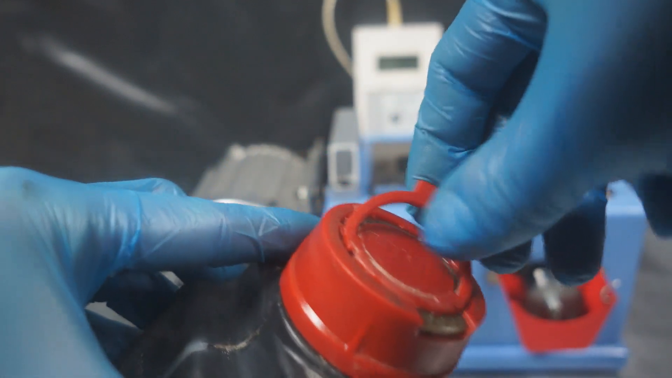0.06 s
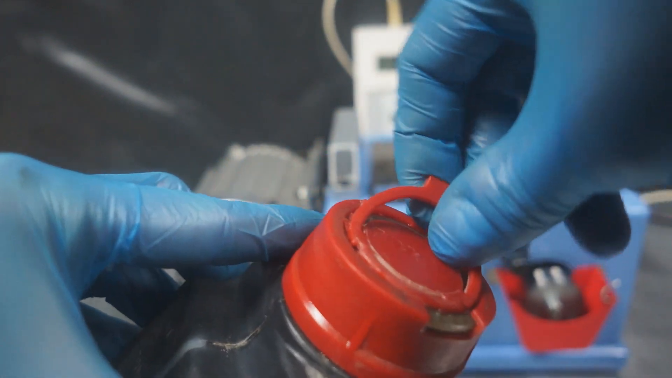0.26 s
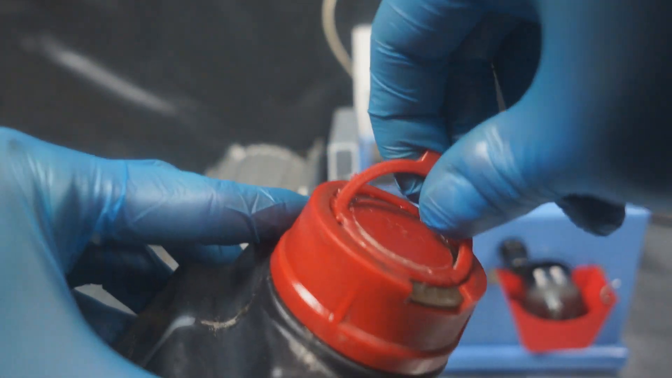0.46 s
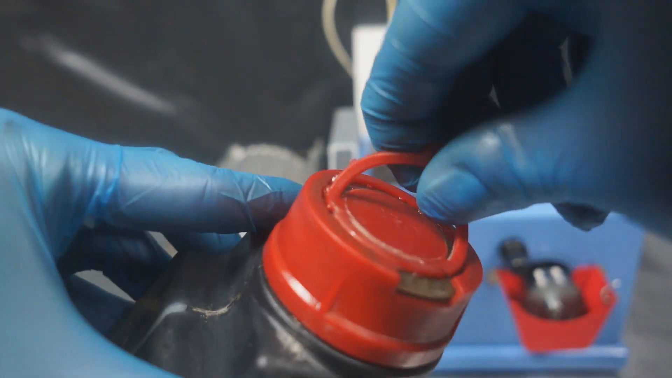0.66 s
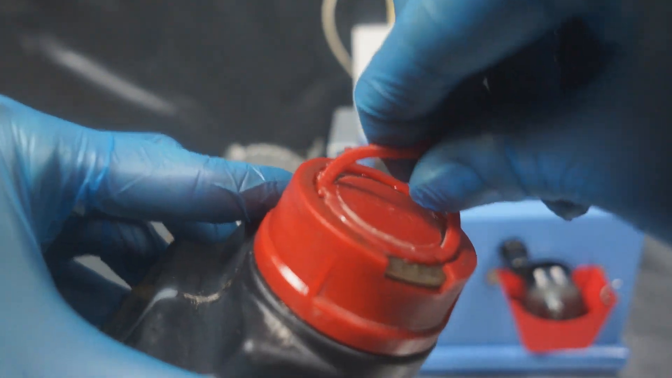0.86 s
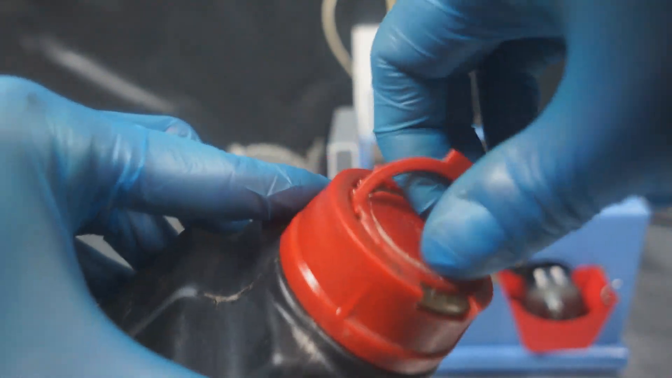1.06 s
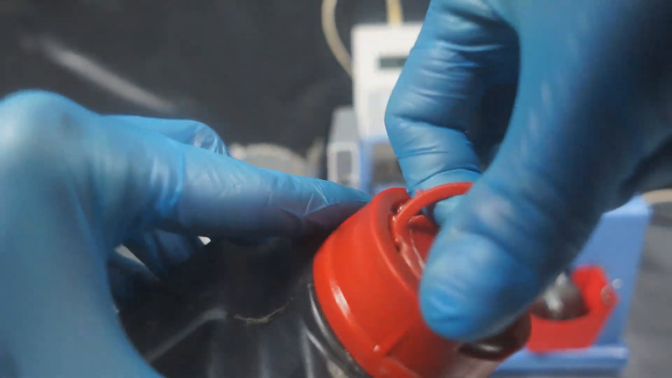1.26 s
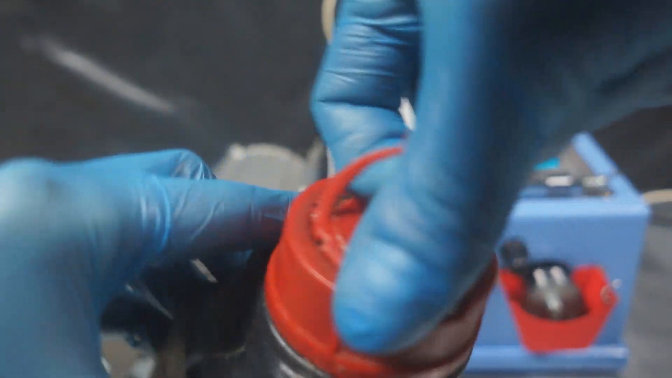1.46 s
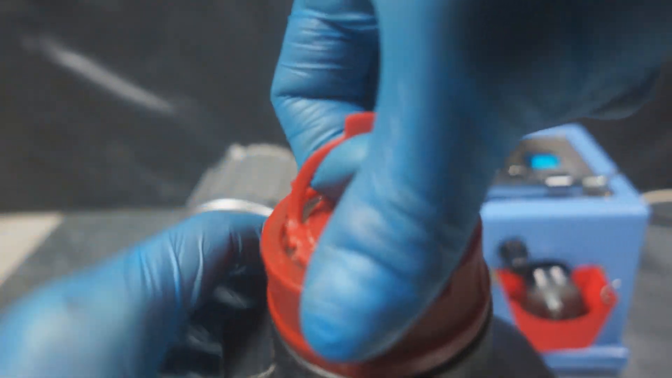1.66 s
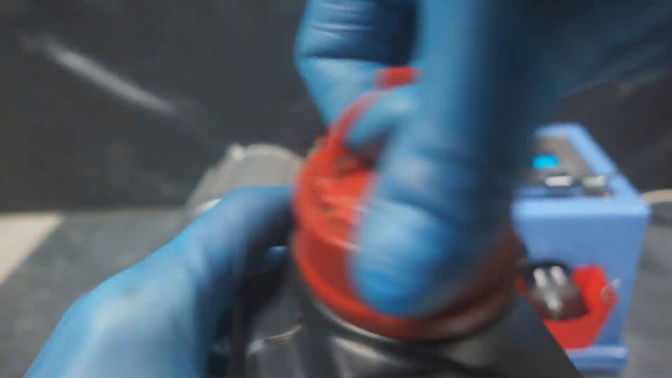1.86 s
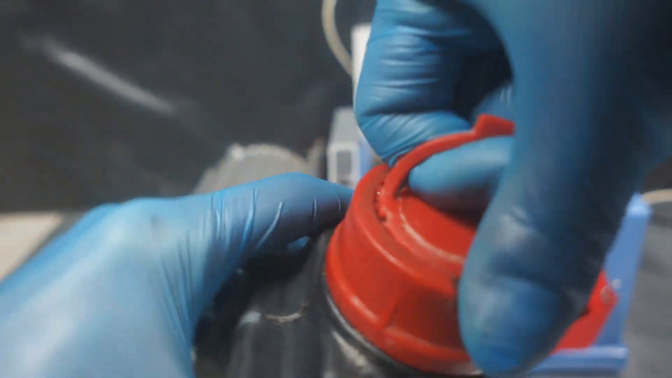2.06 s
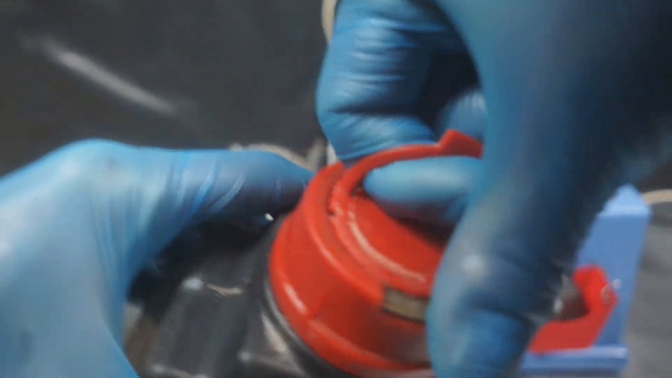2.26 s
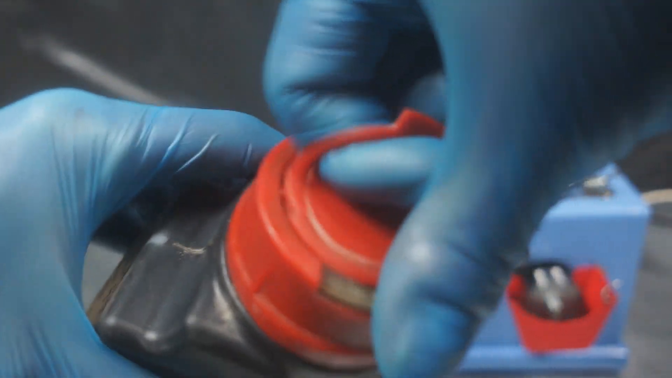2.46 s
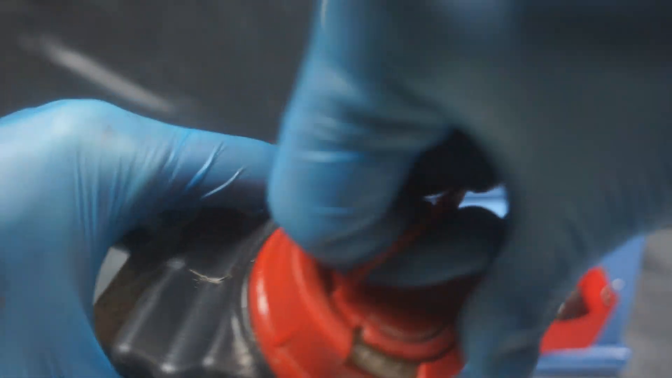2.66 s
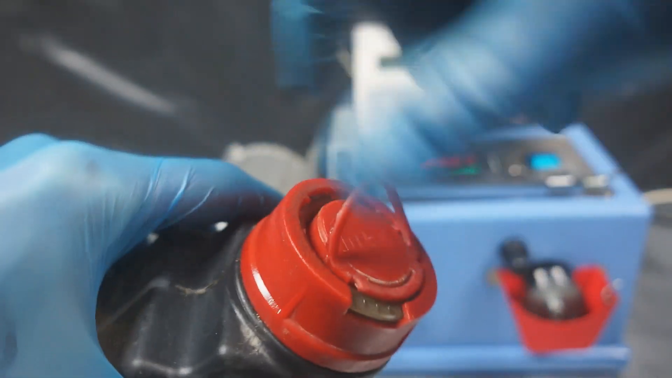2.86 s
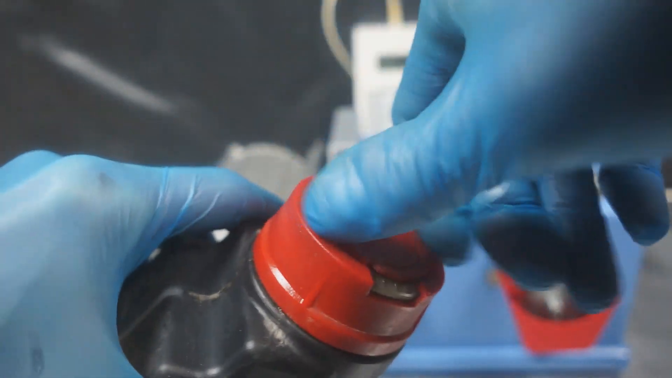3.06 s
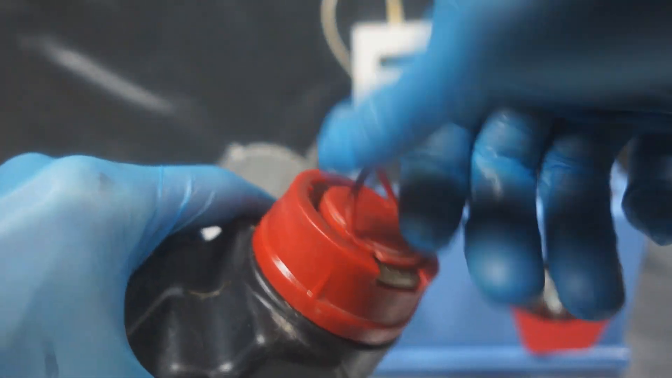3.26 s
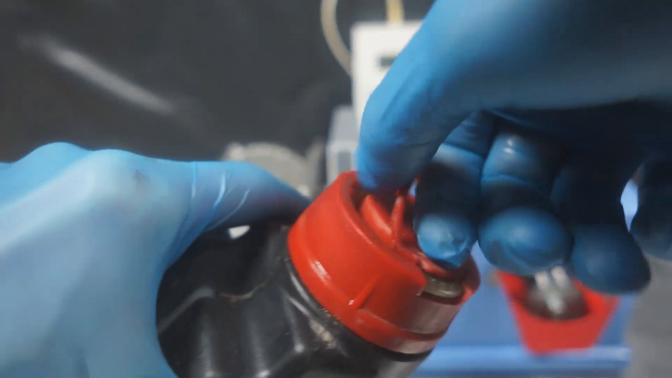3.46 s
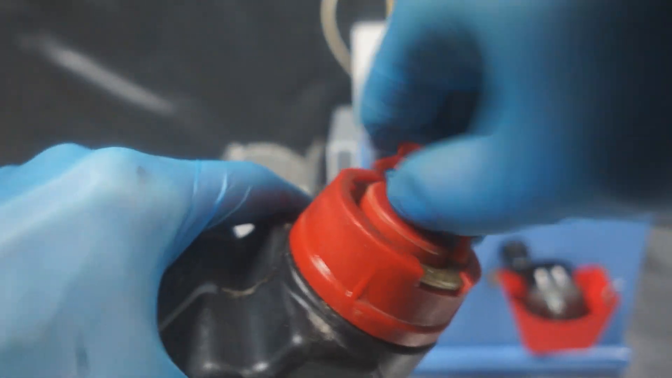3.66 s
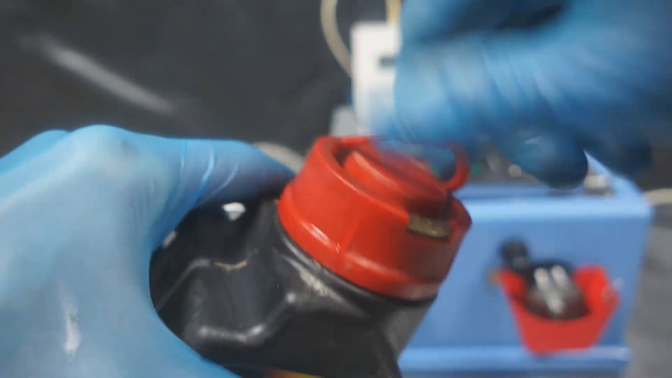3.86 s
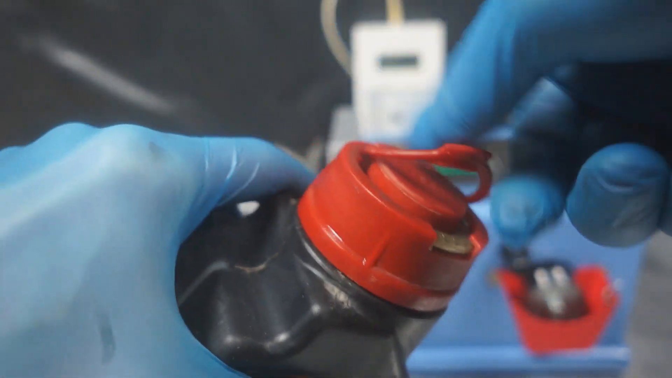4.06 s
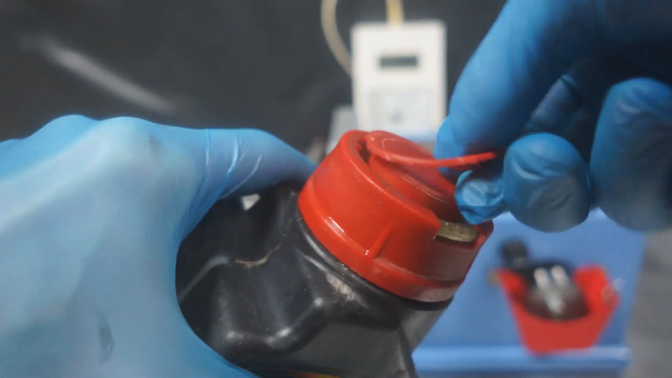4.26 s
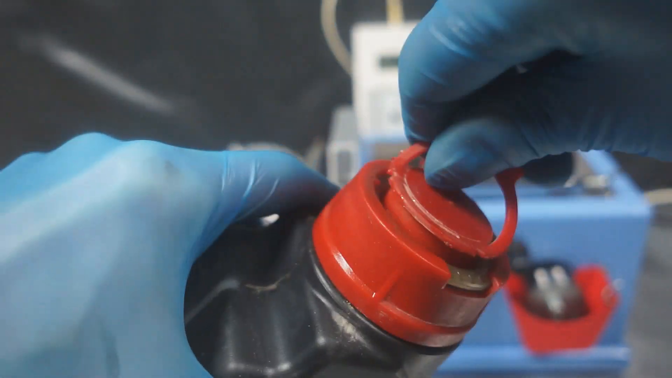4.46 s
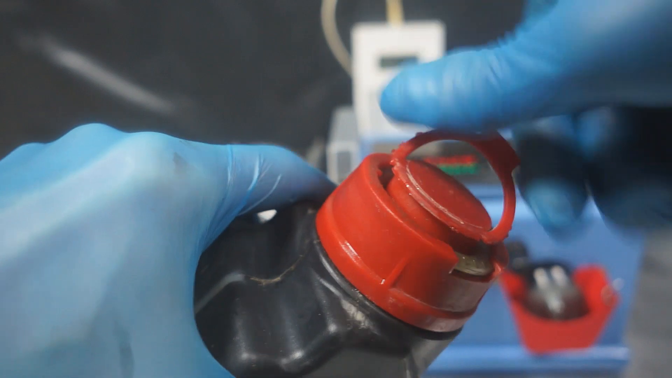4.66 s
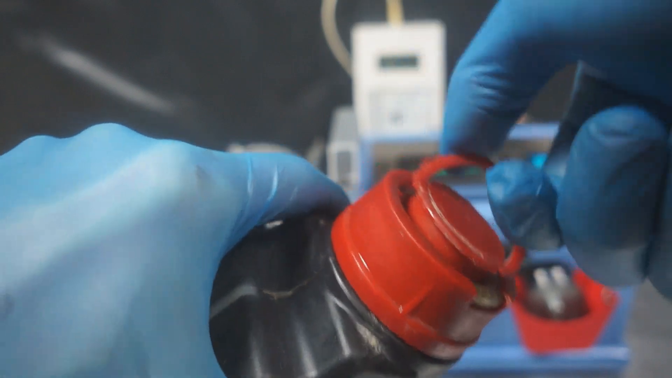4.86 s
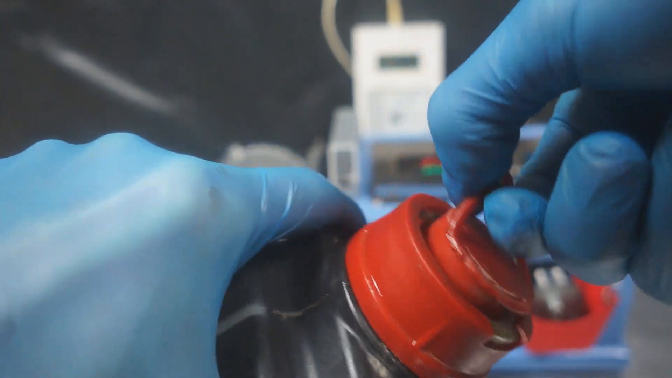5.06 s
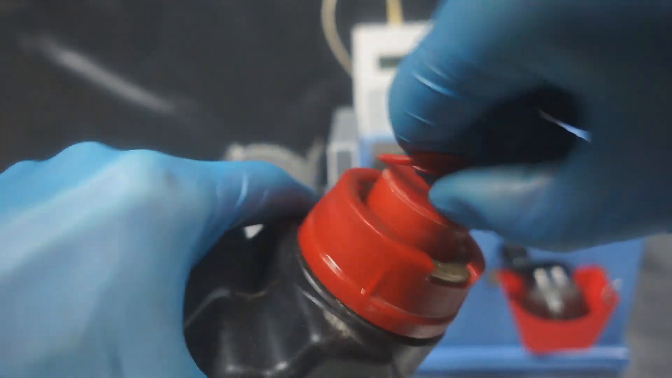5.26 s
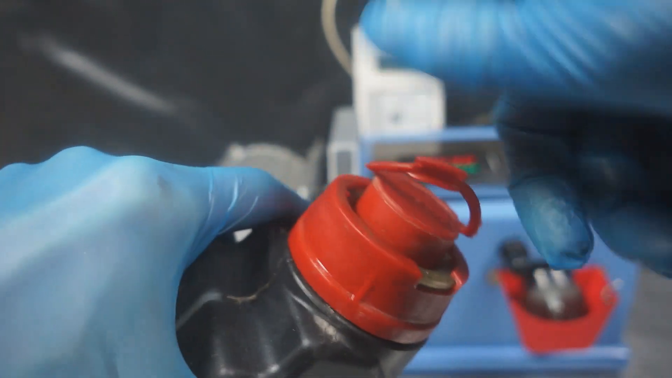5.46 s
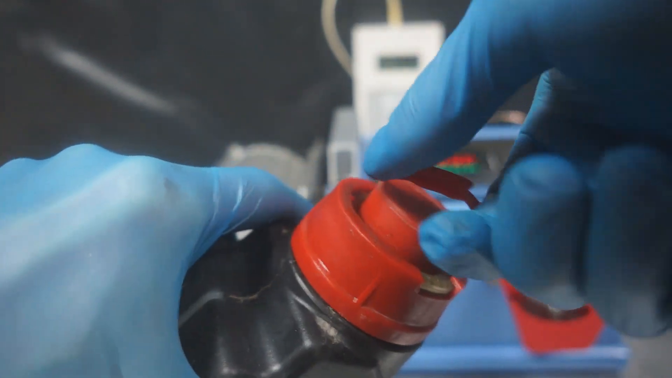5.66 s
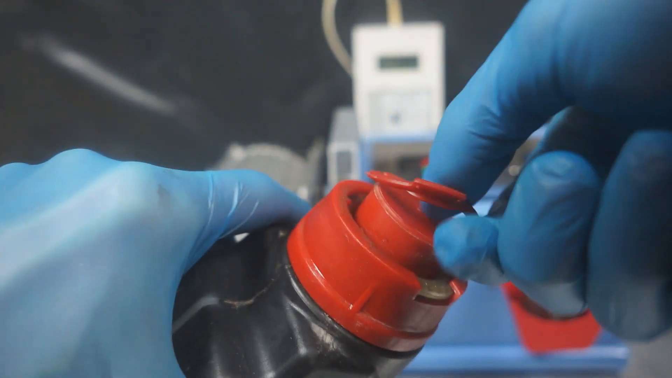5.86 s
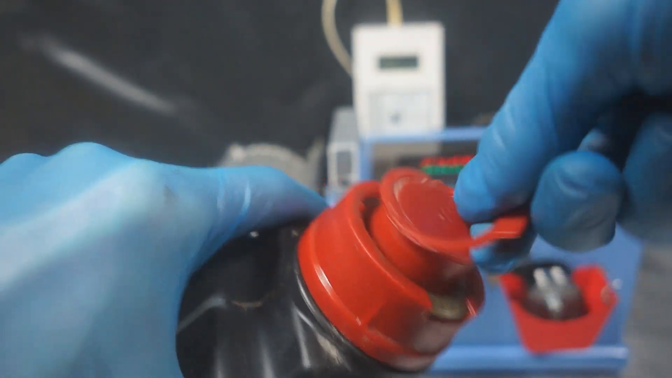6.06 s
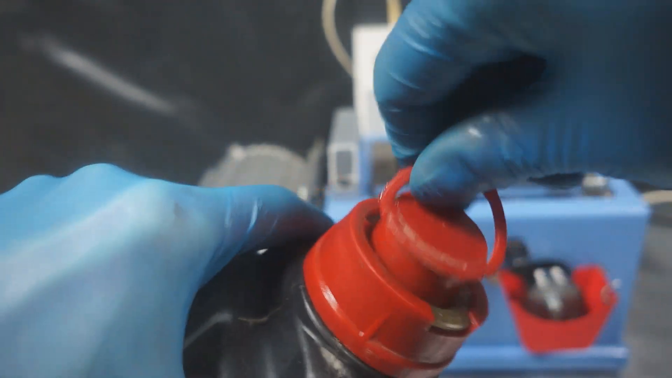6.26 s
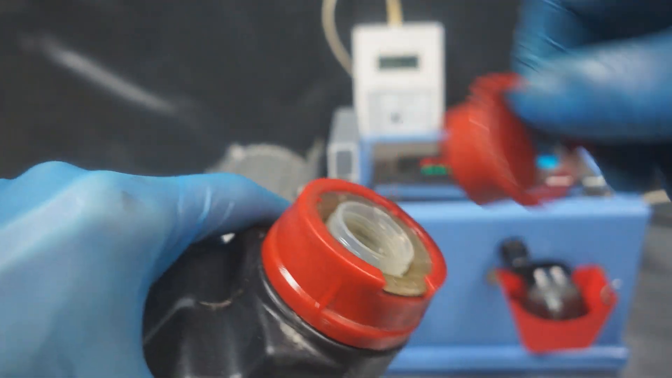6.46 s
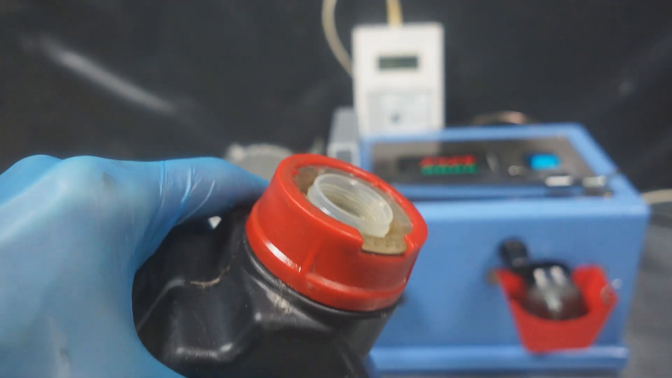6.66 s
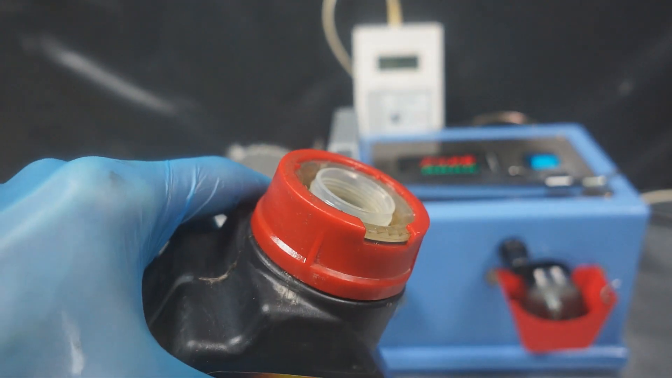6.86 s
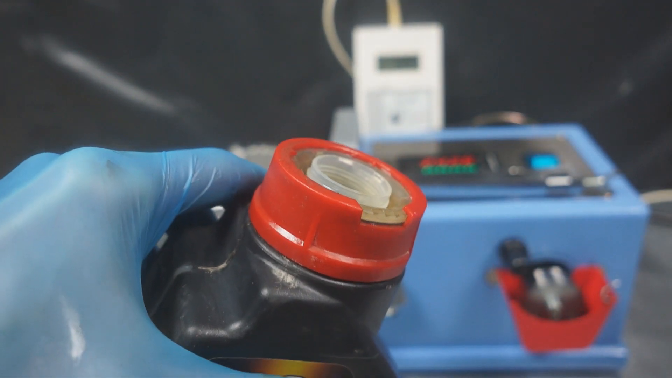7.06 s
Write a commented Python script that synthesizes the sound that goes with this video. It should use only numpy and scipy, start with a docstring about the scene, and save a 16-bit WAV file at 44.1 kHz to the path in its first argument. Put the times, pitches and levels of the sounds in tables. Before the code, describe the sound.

Close rubbery squeaks, irregular plastic clicks and sharp cracks on an oil bottle cap, a small air gulp, then one loud plastic clack.

```python
"""A small workshop's fan hums while gloved fingers, close by, rub and pry the pull-ring plug of a plastic oil bottle.
Air and hum are filtered noise; the gloves are uneven noise grains shaped by strokes, with resonant noise bursts.
Snaps are noise cracks, pings and ringing cap modes; thuds are slow bottle modes, and air gulps are gliding sines.
At the end the plug clacks on the bench and bounces: decaying modes, chatter and dust with a wetter room tail."""
import sys
import numpy as np
from scipy import signal
from scipy.fft import rfft, irfft
from scipy.io import wavfile
from scipy.ndimage import uniform_filter1d

SR = 44100
rng = np.random.default_rng(int(sys.argv[2]) if len(sys.argv) > 2 else 0)


def transcribe(u):
    """Save the signal u as a 16-bit wav file named by the first command-line argument.

    u: samples, shape (n,) or (channels, n), limited to [-1, 1]; the rate is SR.
    q: integer samples, one column per channel.
    """
    v = np.clip(np.atleast_2d(u).T, -1, 1)
    q = np.round(v * 32767).astype(np.int16)
    wavfile.write(sys.argv[1], SR, q)


N = 313551
HZ = np.maximum(np.fft.rfftfreq(N, 1 / SR), 1)
HANDS_PAN_DB, BOTTLE_PAN_DB = 2.5, -1.5  # left minus right
BUSY_S = (1.0, 6.35)  # between these times the gloves never lie still


def undb(db):
    """Turn decibels into an amplitude factor."""
    return 10 ** (np.asarray(db) / 20)


def level(x, db):
    """Scale a sound to an RMS level in dB."""
    return x * undb(db) / np.sqrt(np.mean(x ** 2))


def along(table):
    """Read a (frequency [Hz], value) table at every frequency, straight between points on a log axis."""
    hz, value = np.transpose(table)
    return np.interp(np.log(HZ), np.log(hz), value)


def shape(x, gain):
    """Filter a full-length sound by a gain at every frequency."""
    return irfft(rfft(x) * gain, N)


def walk(rate):
    """Random levels held 1 / rate s and slewed twice; spread near 1."""
    hold = int(SR / rate)
    steps = np.repeat(rng.standard_normal(N // hold + 1), hold)
    return 1.4 * uniform_filter1d(uniform_filter1d(steps, hold), hold)[:N]


def fade(t, t60):
    """Exponential decay that loses 60 dB in t60 seconds."""
    return np.exp(-np.log(1000) * t / t60)


def resonance(hz, width_hz):
    """Gain of a single resonant hump, 1 at its centre."""
    return 1 / (1 + (2 * (HZ - hz) / width_hz) ** 2)


def bandpass(x, hz, width_hz):
    """Keep one band of a short sound."""
    edges = [hz - width_hz / 2, hz + width_hz / 2]
    return signal.sosfilt(signal.butter(2, edges, "band", fs=SR, output="sos"), x)


def small(x, hz):
    """Small things move little air below hz."""
    return signal.sosfilt(signal.butter(4, hz, "high", fs=SR, output="sos"), x)


def add(out, s, y, pan_db):
    """Mix a short sound in at time s, panned by left minus right dB."""
    i = int(s * SR)
    y = y[:N - i]
    out[:, i:i + len(y)] += y * undb(np.array([[pan_db], [-pan_db]]) / 2)


# Spectrum of the workshop air: (frequency [Hz], relative level per hertz [dB])
AIR_COLOUR = [(12, -60), (25, -36), (68, -27), (107, -17), (248, -14), (310, 1), (357, -11.5), (590, -8),
              (849, -22.5), (923, -9.5), (1190, -14), (1760, -17), (2080, -19.5), (4180, -18),
              (16000, -27.5)]
# Resonances heard in the background: fan hum, and a hump near 4.9 kHz from the microphone:
# (centre [Hz], width [Hz], RMS level [dB])
BACKGROUND_HUMPS = [(312, 7, -66), (311, 35, -66), (625.5, 188, -58.5), (1722, 73, -73.5),
                    (4890, 480, -67.5)]
# Left-right likeness of the background: (frequency [Hz], likeness [0-1])
LIKENESS = [(100, 0.04), (300, 0.17), (640, 0.48), (1400, 0), (4000, 0.1), (15000, 0)]
AIR_DB = -54.5  # before the gentle wavering
RUMBLE_HZ, RUMBLE_WIDTH_HZ, RUMBLE_DB = 135, 70, -73
RUMBLE_STOPS_S, RUMBLE_FADE_S = 4.8, .2


def shop():
    """Wavering air and electronics hiss, resonant humps and a low rumble that dies away, partly alike in stereo."""
    alike = np.clip(along(LIKENESS), 0, 1)

    def pair(gain):
        mid = shape(rng.standard_normal(N), gain * np.sqrt(1 + alike))
        side = shape(rng.standard_normal(N), gain * np.sqrt(1 - alike))
        return np.array([mid + side, mid - side])

    air = level(pair(undb(along(AIR_COLOUR))), AIR_DB) * undb(1.34 * walk(3.318))
    rumble = level(pair(resonance(RUMBLE_HZ, RUMBLE_WIDTH_HZ)), RUMBLE_DB)
    rumble_fade = np.clip((RUMBLE_STOPS_S - np.arange(N) / SR) / RUMBLE_FADE_S, 0, 1)
    humps = sum(level(pair(resonance(hz, width)), db) for hz, width, db in BACKGROUND_HUMPS)
    return air + rumble * rumble_fade + humps


# Strokes of glove on plastic: (start [s], swell [s], fade to lose 29 dB [s], hiss level [dB],
# finest grain against the hiss [dB], shaken cap against the hiss [dB])
STROKES = [(0.0, 0.006, 0.04, -53, -2, 3), (.02, 0.075, 1.08, -63.5, 2, -3.5),
           (.55, 0.234, 0.4, -59.5, -3.5, -6), (.975, .05, .11, -47, 1, -10),
           (1.072, 0.0157, 0.1867, -40.5, -2, -8.5), (1.14, 0.0405, 0.048, -36, -4.5, -15.5),
           (1.25, 0.0644, .2, -46, -2, -2), (1.27, 0.202, .5, -43.5, -4, -8),
           (1.72, 0.0387, .1, -42.5, -3, -17), (1.82, 0.0445, 0.1636, -46, -4, -5.5),
           (1.885, .01, .03, -48, 3, -10), (1.93, .075, 0.1276, -46, -3, 1),
           (2.1, 0.101, 0.17, -55.5, -0.5, -2), (2.345, 0.0118, 0.0039, -45.5, 3, -14.5),
           (2.497, 0.0076, 0.0582, -32.5, 1.5, -10), (2.51, 0.082, 0.19, -41, 2, -2),
           (2.69, 0.051, 0.1489, -40.5, -0.5, -8.5), (2.765, 0.0402, 0.05, -32, 2.5, -23),
           (2.81, 0.0347, 0.02, -43, 8.5, -7.5), (2.87, 0.065, 0.0728, -47.5, .5, -12),
           (2.98, 0.0397, 0.11, -54.5, 1, -0.5), (3.095, 0.0128, 0.0512, -34, 2, -9.5),
           (3.11, .016, .016, -39, 2, -6), (3.13, .058, .022, -41, 1, 3),
           (3.21, 0.0278, 0.0739, -50, 4, -11), (3.25, 0.01, 0.08, -43, -1, -3),
           (3.447, 0.002, .04, -49, -4, -4), (3.489, 0.003, 0.06, -41, -4, -6),
           (3.609, 0.003, 0.19, -42, 0, -2), (3.63, 0.085, .1, -35, -1.5, -7.5),
           (3.84, 0.0269, 0.05, -48, 4, -3), (3.875, 0.0194, .06, -37, -2, -10),
           (3.98, 0.0266, 0.11, -49, -1.5, -1), (4.04, 0.0496, 0.05, -47, 0, -3.5),
           (4.11, .06, .05, -55, 2, -8), (4.193, 0.0071, .07, -39, -3, -32),
           (4.2722, .0015, .075, -33, -4.5, -10), (4.29, 0.0667, 0.1377, -42.5, -3, 0.5),
           (4.34, 0.0791, .072, -31, -3, -16), (4.5, 0.0427, 0.1137, -53, 3.5, -9),
           (4.56, 0.0588, .025, -46.5, -0.5, -11), (4.65, 0.018, 0.0962, -51.5, 4, 2),
           (4.71, 0.0722, 0.13, -48, -1.5, -7), (4.83, 0.0452, 0.1178, -49.5, -2.5, 0),
           (5.027, 0.004, 0.105, -35, -6, -4), (5.149, 0.004, 0.2, -38.5, -5, -1),
           (5.16, .072, 0.11, -38, -1.5, -14), (5.417, .004, .2, -47, 0, -6),
           (5.52, 0.0666, 0.082, -48, 0, -7), (5.71, 0.0341, 0.03, -41, -3, -5.5),
           (5.845, 0.042, 0.006, -37.5, -5.5, -10.5), (5.905, 0.0398, 0.03, -50.5, -5, -4),
           (5.985, 0.0213, 0.2063, -46, 0, -19), (6.045, 0.0173, .13, -40.5, 3, -3),
           (6.16, 0.032, 0.0378, -50, 3, 0), (6.2, 0.0416, 0.0371, -41.5, -4.5, -5),
           (6.27, 0.0295, 0.0532, -50, -9, -19.5), (6.36, 0.146, 0.1131, -51.5, -3.5, -10.5)]
SWELL_POWER, FADE_POWER = 1.337, 1.28  # how bowed the swell and the fade are
FADE_DB, LIFT_DB = 20, 9  # the finger lifts as the fade runs out and the stroke stops short
FIDGET_DB = (-63, -66, -65)  # restless gloves between strokes: hiss, finest grain, shaken cap


def pressure():
    """Gains of hiss, finest grain and shaken cap: each stroke swells, then fades ever faster."""
    t = np.arange(N) / SR
    power = np.outer(undb(FIDGET_DB) ** 2, (t > BUSY_S[0]) & (t < BUSY_S[1]))
    for s, swell, fall, db, fine_db, shake_db in STROKES:
        up = np.clip((t - s) / swell, 0, 1) ** SWELL_POWER
        gone = np.clip((t - s - swell) / fall, 0, 3)
        down = undb(-FADE_DB * gone ** FADE_POWER - LIFT_DB * gone ** 6)
        power = power + np.outer(undb([db, db + fine_db, db + shake_db]), up * down) ** 2
    return np.sqrt(power)


WANDER = 0.09  # share by which the pitch of the rub strays either way with the patch of skin in contact


def slips(colour, gain, patchy_db, grip):
    """Tiny slips of rubber: uneven noise grains drifting between a lower and a higher copy of their colour."""
    grain_db = 2.0 * np.minimum(rng.exponential(size=N), 6.0)
    grains = rng.standard_normal(N) * undb(grain_db + 1.5 * grip + patchy_db * walk(70))

    def pitched(factor):
        return level(shape(grains, undb(along(np.array(colour) * [factor, 1]))), 0)

    low, high = pitched(1 - WANDER), pitched(1 + WANDER)
    mix = np.pi / 4 * (1 + np.tanh(walk(9)))
    return level(low * np.cos(mix) + high * np.sin(mix), 0) * gain


# Spectrum of rubber hissing over plastic: (frequency [Hz], relative level per hertz [dB])
HISS_COLOUR = [(2800, -15), (3600, -2.5), (4300, 2.5), (4950, 4.5), (5700, 2.5), (7000, -2.5),
               (8500, -27.5)]
# Spectrum of the finest grain: (frequency [Hz], relative level per hertz [dB])
SHEEN_COLOUR = [(5500, -31), (7000, -2.5), (8500, -2), (10500, -1), (13000, -10.5), (15000, -40.5)]
# Spectrum of the cap shaken by the slips: (frequency [Hz], relative level per hertz [dB])
SHAKE_COLOUR = [(250, -54), (500, -4), (730, -0.5), (1200, 0), (2100, -1.5), (3100, -2.5), (4200, -17)]
# The hand has let go and the glove rustles to the right, wider: (start [s], end [s])
ASIDE = [(4.5, 5.0), (5.34, 5.7)]
ASIDE_PAN_DB, ASIDE_WIDE_DB = -2, 5


def rub():
    """Countless tiny slips of rubber, uneven and patchy, heard as hiss and through the shaken cap."""
    hiss, fine, shake = pressure()
    grip = walk(120)  # the whole contact catches and lets go
    sound = slips(HISS_COLOUR, hiss, 1.7, grip)
    sound = sound + slips(SHEEN_COLOUR, fine, 0.5, grip)
    sound = sound + slips(SHAKE_COLOUR, shake, 2.25, grip)
    # the finest grain comes from all over both gloves, so it is wider
    wide = slips(SHEEN_COLOUR, fine * undb(-8.5), 0.72, grip) * np.array([[1], [-1]])
    t = np.arange(N) / SR
    aside = uniform_filter1d(sum(1. * (t > a) * (t < b) for a, b in ASIDE), size=900)
    pan_db = HANDS_PAN_DB + (ASIDE_PAN_DB - HANDS_PAN_DB) * aside
    return (sound + wide * undb(ASIDE_WIDE_DB * aside)) * undb([pan_db / 2, -pan_db / 2])


# Bursts of noise coloured by one resonance: hollow or squeaky drags, bright hiss, cracks and a ringing tone:
# (start [s], length [s], centre [Hz], width [Hz], RMS level before its swell and fade [dB])
COLOURED_BURSTS = [(0.0, .028, 2000, 600, -43), (1.0805, .008, 5400, 1400, -33),
                   (1.103, .018, 6000, 1400, -36), (5.858, .034, 650, 350, -44),
                   (1.33, .3, 5700, 1300, -49), (1.082, .066, 775, 250, -41), (2.775, .065, 5200, 900, -33),
                   (4.072, .039, 1950, 450, -48), (4.064, .035, 900, 300, -48),
                   (4.193, .045, 5000, 1300, -37), (4.655, .05, 1150, 500, -46),
                   (4.84, .065, 1050, 500, -45), (4.32, .17, 2200, 900, -42), (6.135, .022, 1750, 150, -45),
                   (6.185, .016, 1400, 700, -48), (6.345, .02, 1950, 370, -52)]


def coloured_bursts():
    """Uneven noise through one resonance, swelling and fading: drags, bright hiss, cracks and a ringing tone."""
    out = np.zeros((2, N))
    for s, length, hz, width_hz, db in COLOURED_BURSTS:
        n = int(length * SR)
        uneven = rng.standard_normal(n) * undb(2.9 * walk(250)[:n])
        coloured = level(bandpass(uneven, hz, width_hz), db)
        add(out, s, coloured * np.sin(np.pi * np.arange(n) / n), HANDS_PAN_DB)
    return out


ROOM_T60_S, ROOM_DB = 0.243, -16


def room(x, db, alike):
    """Decaying noise tails to each side, sharing a part set by alike, treble dying sooner, after a short gap."""
    t = np.arange(SR // 2) / SR
    noise = rng.standard_normal((2, len(t)))
    noise = noise + alike * rng.standard_normal(len(t))
    dull = uniform_filter1d(noise, size=7, axis=1)
    tail = dull * fade(t, ROOM_T60_S) + (noise - dull) * fade(t, 0.72 * ROOM_T60_S)
    tail = tail * (t > .004)
    tail = tail / np.sqrt(np.sum(tail ** 2) / 2)
    return signal.fftconvolve(x.mean(0)[None], tail, axes=1)[:, :N] * undb(db)


BENCH_T60_S, BENCH_DB = .006, -16.5


def bench(x):
    """The first reflections off bottle and bench reach the two sides in opposite polarity."""
    t = np.arange(SR // 100) / SR
    echo = level(rng.standard_normal(len(t)) * fade(t, BENCH_T60_S), BENCH_DB) / np.sqrt(len(t))
    return signal.fftconvolve(x.mean(0), echo)[:N] * np.array([[1], [-1]])


def ring(modes, share_db, detune, sense, t):
    """One blow on a set of modes, peak 1, each with its own sense of swing and shift of share and pitch."""
    hz, db, t60 = np.array(modes).T[:, :, None]
    swing = np.sin(2 * np.pi * hz * (1 + detune[:, None]) * t)
    gain = sense[:, None] * undb(db + share_db[:, None])
    y = np.sum(gain * fade(t, t60) * swing, axis=0)
    return y / np.abs(y).max()


def struck(modes, hz, chance, t, focus_db):
    """The spot that is struck favours the modes near hz, by focus_db an octave; grip shifts each a little."""
    near_db = -focus_db * np.abs(np.log2(np.array(modes)[:, 0] / hz))
    return ring(modes, near_db + 2 * chance[0], chance[1] / 20, np.sign(chance[2]), t)


TICKS_PER_S, TICK_DB, TICK_SPREAD_DB = 4, -46, 3.5  # spread either way


def ticks():
    """Small ticks that fall by chance while the hands are busy, as rows like those of the snaps."""
    start, span = BUSY_S[0], BUSY_S[1] - BUSY_S[0]
    chance = rng.random((int(TICKS_PER_S * span), 5))
    size_db = TICK_DB + TICK_SPREAD_DB * (2 * chance - 1)
    return [(start + span * c[0], db[1], -10 * c[2], db[3], 700 * 2 ** c[4])
            for c, db in zip(chance, size_db)]


# Snaps and knocks: (time [s], crack level [dB], sharpness as finest grain against the crack [dB],
# cap ring level [dB], ring centre [Hz])
SNAPS = [(0.1693, -33, -12, -34, 790), (0.3691, -43, 0, -41, 1400), (0.652, -45, 3, -50, 3000),
         (0.7755, -39, -12, -31.5, 1700), (1.0826, -21.5, -4.5, -29, 737), (1.099, -36, 0, -35, 760),
         (1.1084, -23, -5.5, -38, 810.0), (1.1175, -33.5, 4, -30, 780.0), (1.2533, -19.5, 3.5, -26, 1110.0),
         (1.2597, -13, 2, -20, 1087), (1.265, -25, 4.0, -20.5, 1040.0), (1.2759, -23.5, 1, -27.5, 1100.0),
         (1.2938, -25, 2, -28.5, 1150.0), (1.306, -33.5, -5.5, -28.5, 1120.0),
         (1.601, -47, -7, -36.5, 1030), (1.8655, -16.5, -11.5, -26.5, 680), (2.176, -44, 4, -55, 2000),
         (2.285, -42, -6, -42, 900), (2.3508, -10, 0, -16, 1574), (2.3535, -22, 3, -30, 800),
         (2.4605, -32, -7, -22, 560), (2.4985, -28, 6, -30, 1500), (2.4998, -17, 8.5, -13, 1900),
         (2.5014, -18, 4.5, -8, 1400), (2.5055, -22, 2, -19.5, 900), (2.51, -24, 2, -24, 1900),
         (2.5474, -32, 10, -27, 1260), (2.8142, -18.5, -14, -50, 1130), (2.8356, -36, 14, -27, 880),
         (3.0153, -32.5, 0, -34, 1270.0), (3.1103, -18.0, -5, -18.5, 780.0), (3.172, -31, 0.5, -33, 800.0),
         (3.18, -27, -12.5, -26, 760.0), (3.2597, -20, -3, -18.5, 950), (3.2724, -32.5, 2.5, -27.5, 780.0),
         (3.6124, -31.5, 2, -28.5, 674), (3.641, -39, -4.0, -24.5, 875), (3.6601, -24, 1, -19, 1000),
         (3.6662, -35.5, 1, -21, 2000), (3.8964, -23.5, -2.5, -24, 726), (4.1127, -30.5, -17, -30.5, 716),
         (4.1999, -23, -16.5, -47.5, 830.0), (4.2052, -25, -13.5, -55.5, 1200.0),
         (4.7032, -35.0, -3.5, -34.5, 820.0), (4.7542, -33, -12, -30, 3000), (4.7769, -32, -7.5, -33, 1000),
         (5.029, -22, -3, -26, 1860.0), (5.5775, -32.5, -4.5, -32, 1200),
         (5.7704, -34.5, -2.0, -32.5, 1080), (5.8419, -26, -7.5, -31, 746), (5.8477, -14.5, -19, -23, 718),
         (5.8983, -19.5, -32.5, -33, 600), (5.9554, -32.5, -10, -54, 2320.0),
         (6.0005, -39, -5.0, -32, 599.8), (6.0132, -32.5, -6.0, -34, 620.0),
         (6.0547, -28.5, -7.0, -34.0, 1330.0), (6.1361, -15.5, -19, -17, 3500),
         (6.2185, -16, -23.5, -14.5, 800), (6.2195, -27, -10, -17, 3000), (6.2235, -28, -6, -26, 1700),
         (6.2407, -27.5, -6, -25, 1000), (6.268, -24.5, -4, -27, 3300), (6.3091, -23, -18, -29, 1900),
         (6.3532, -38, -10, -41, 600.0)]
# Modes of the cap before small chance shifts: (frequency [Hz], relative level [dB], t60 [s])
CAP_MODES = [(500, -8, .016), (640, 0, .018), (780, 0, .02), (950, 0, .015), (1150, 0, .015),
             (1400, 0, .012), (1750, 0, .014), (2050, 1, .011), (2450, 1, .01), (2900, 0, .009),
             (3600, 0, .009), (4300, -2, .008)]
SPIKE_T60_S, CRACK_T60_S, CRACK_TAIL = .0035, 0.016, .4  # opening spike, slower tail and its share
# the duller a crack, the more the pull-ring pings; all ping at this sharpness
PING_HZ, PING_T60_S, ALL_PING_DB = 4560, 0.012, -35.5


def snaps():
    """Each snap is a crack of bright noise or pull-ring ping, plus the ring of the cap."""
    out, t = np.zeros((2, N)), np.arange(SR // 10) / SR
    coarse, fine = (level(shape(rng.standard_normal(N), undb(along(colour))), 0)
                    for colour in (HISS_COLOUR, SHEEN_COLOUR))
    rows = SNAPS + ticks()
    chance = rng.standard_normal((len(rows), 4, len(CAP_MODES)))
    burst = fade(t, SPIKE_T60_S) + CRACK_TAIL * fade(t, CRACK_T60_S)
    burst = burst * np.minimum(t / .0001, 1)
    ping_shape = fade(t, PING_T60_S) * np.minimum(t / 0.000473, 1)
    for (s, crack_db, fine_db, cap_db, cap_hz), c in zip(rows, chance):
        i = int(s * SR)
        low, high = coarse[i:i + len(t)] * burst, fine[i:i + len(t)] * burst
        low, high = low / np.abs(low).max(), high / np.abs(high).max()
        share = np.clip(fine_db / ALL_PING_DB, 0, 1)
        ping = np.sin(2 * np.pi * PING_HZ * (1 + 0.02 * c[3, 1]) * t) * ping_shape
        crack = (1 - share) * low + share * ping + undb(fine_db) * high
        cap = struck(CAP_MODES, cap_hz, c, t, focus_db=10.0)
        add(out, s, undb(crack_db) * crack + undb(cap_db) * cap, HANDS_PAN_DB + .8 * c[3, 0])
    return out


# Knocks on the bottle wall: (time [s], level [dB], ring centre [Hz],
# share of the free ring time that the grip leaves [0-1])
THUDS = [(0.171, -41, 300, .8), (1.121, -39, 200, .6), (1.2555, -42, 179, .8), (1.2654, -38.5, 150, .8),
         (1.8653, -29, 150, .9), (2.3524, -40, 230, .4), (2.4607, -25, 340, .55), (2.5025, -30, 420, .4),
         (2.503, -30, 130, .5), (3.0145, -40.5, 448, .8), (3.11, -32, 320, .7), (3.1725, -35.5, 480, .8),
         (3.256, -40.5, 480, .8), (3.6596, -37, 240, .7), (5.03, -40, 350, .8), (5.842, -37, 441, .8),
         (6.0002, -41, 480, .6), (6.0132, -38.5, 380, .8), (6.0553, -40, 260, .6), (6.14, -28, 350, .45),
         (6.2188, -24, 400, .4), (6.241, -34, 330, .5)]
# Modes of the free bottle before small chance shifts: (frequency [Hz], relative level [dB], t60 [s])
BOTTLE_MODES = [(125.7, -11.5, 0.105), (174.1, -5, 0.177), (241, 8, 0.058), (348.4, 12.5, 0.0538),
                (463.2, 8.5, 0.0634)]


def thuds():
    """The wall of the bottle answers a push slowly, so its low ring starts soft."""
    out, t = np.zeros((2, N)), np.arange(SR // 6) / SR
    chance = rng.standard_normal((len(THUDS), 3, len(BOTTLE_MODES)))
    for (s, db, hz, free), c in zip(THUDS, chance):
        held = np.array(BOTTLE_MODES) * [1, 1, np.clip(free, .1, 2)]
        wall = struck(held, hz, c, t, focus_db=12.0) * (1 - np.exp(-t / 0.0012))
        add(out, s, undb(db) * wall, BOTTLE_PAN_DB)
    return out


# Air gulps into the neck as the plug loosens:
# (time [s], first pitch [Hz], last pitch [Hz], t60 [s], level before its swell and decay [dB])
GULPS = [(6.184, 350, 320, .07, -42), (6.308, 310, 410, .075, -30)]
GULP_SWELL_S, GULP_GLIDE_S = .004, .015  # time constants


def gulps():
    """Air in the neck sounds as a soft-starting sine that glides in pitch and dies away."""
    out, t = np.zeros((2, N)), np.arange(SR // 6) / SR
    for s, first_hz, last_hz, t60, db in GULPS:
        hz = last_hz + (first_hz - last_hz) * np.exp(-t / GULP_GLIDE_S)
        tone = np.sin(2 * np.pi * np.cumsum(hz) / SR)
        gulp = tone * fade(t, t60) * (1 - np.exp(-t / GULP_SWELL_S))
        add(out, s, undb(db) * gulp, BOTTLE_PAN_DB)
    return out


# The plug lands on the bench and bounces: (time [s], level [dB], left minus right [dB])
DROP_HITS = [(7.0388, -2, 0.3), (7.0515, -25, 0.3), (7.079, -30, 0.3)]
# Modes of the plug: (frequency [Hz], relative level [dB], t60 [s])
PLUG_MODES = [(480, -6, .018), (890, -15, .012), (1200, -15, .012), (1510, -8, .012), (1765, -4, .013),
              (2250, -4, .009), (2780, 2, .012), (3445, 0, .009), (4020, -7, .008), (4690, -11, .015),
              (6680, -17, .008), (10300, -8, .01)]
SWING_HZ = (600, 3800)  # modes outside this range swing the other way
DROP_ROOM_DB = -11.5


def drop():
    """The plug's modes clack on the bench and chatter for a moment, wetter than the hands."""
    out, t = np.zeros((2, N)), np.arange(SR // 8) / SR
    chatter = 0.035 * rng.standard_normal(len(t)) * fade(t, 0.03)
    chatter[0] = 1
    plug_hz = np.array(PLUG_MODES)[:, 0]
    sense = -np.sign(np.prod(np.subtract.outer(plug_hz, SWING_HZ), axis=1))
    unshifted = np.zeros(len(PLUG_MODES))
    blow = ring(PLUG_MODES, unshifted, unshifted, sense, t)
    clack = signal.fftconvolve(blow, chatter)[:len(t)]
    clack = np.convolve(clack, np.hanning(8) / 3)[:len(t)]  # the contact lasts a moment, which dulls the top
    dust = 0.008 * rng.standard_normal(len(t)) * fade(t, 0.25)
    for s, db, pan_db in DROP_HITS:
        add(out, s, undb(db) * (clack + dust), pan_db)
    return out + room(out, DROP_ROOM_DB, alike=1.5)


def scene():
    """Hands with their reflections and room, the dropped plug, and the workshop behind."""
    hands = small(rub() + coloured_bursts(), hz=191.6) + small(snaps(), hz=385)
    hands = hands + small(thuds() + gulps(), hz=94.2)
    plug = small(drop(), hz=362)
    return hands + room(hands, ROOM_DB, alike=0) + plug + bench(hands) + shop()


# Gain of the right microphone port over the left: (frequency [Hz], right minus left [dB])
RIGHT_OVER_LEFT = [(30, 3), (70, 8), (120, 11.5), (220, 2.5), (700, 1.5), (8000, -0.5), (15000, 8.5)]
PORT_HZ, PORT_WIDTH_HZ, PORT_GAIN = 4850, 600, 0.25  # resonance of the ports; gain is added to 1
TOP_HZ = 15900


def record(dry):
    """The microphone ports resonate faintly near 5 kHz and differ in tone; the top is cut steeply."""
    tilt = undb(along(RIGHT_OVER_LEFT) / 2)
    port = 1 + PORT_GAIN / (1 + 2j * (HZ - PORT_HZ) / PORT_WIDTH_HZ)
    ports = np.array([shape(dry[0], port / tilt), shape(dry[1], port * tilt)])
    return signal.sosfilt(signal.ellip(10, .2, 70, TOP_HZ, fs=SR, output="sos"), ports)


dry = scene()
out = record(dry)
transcribe(out)
```